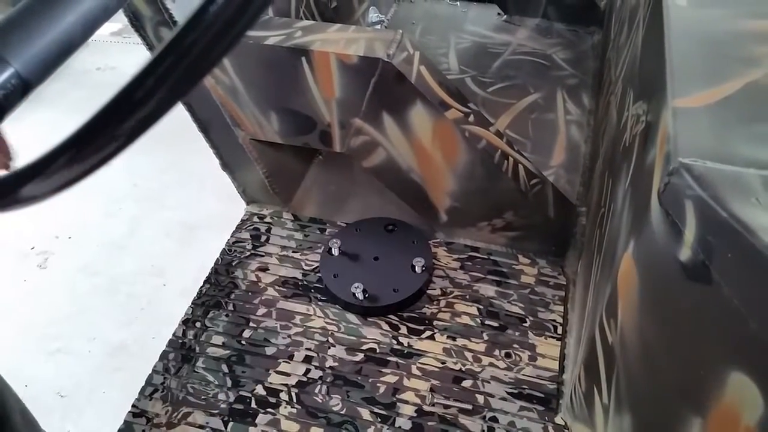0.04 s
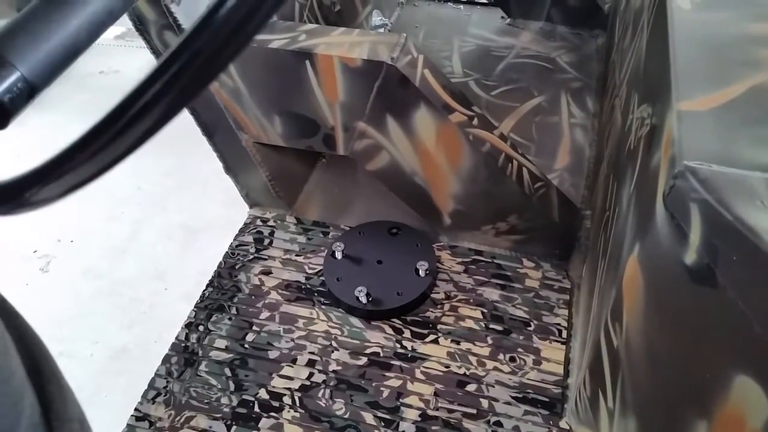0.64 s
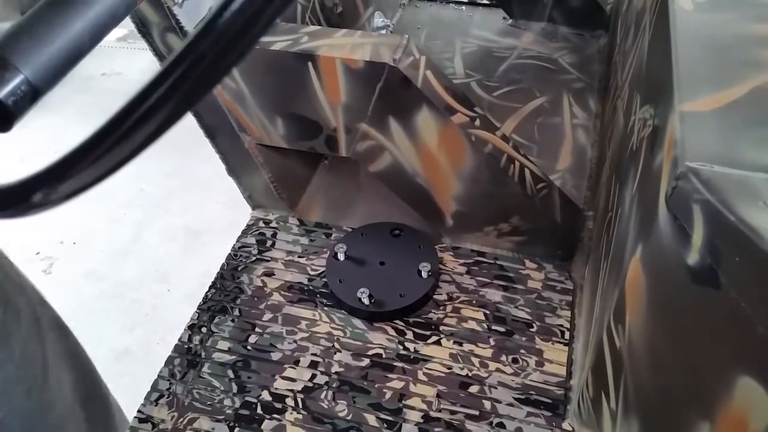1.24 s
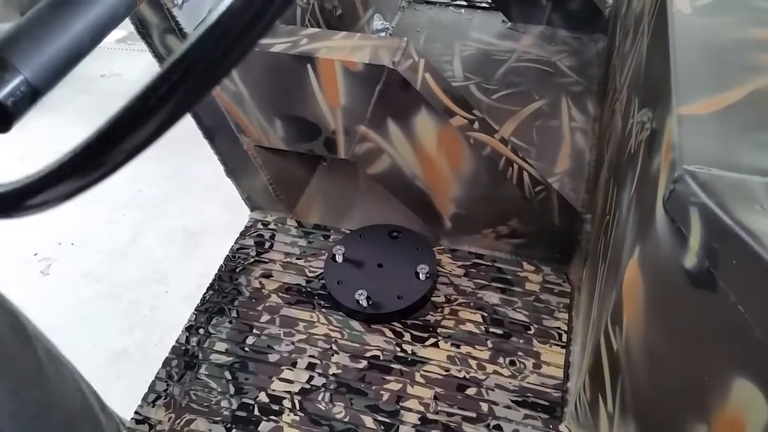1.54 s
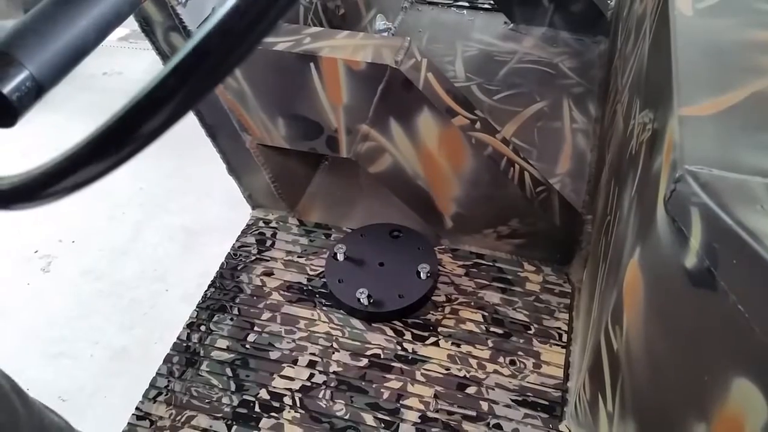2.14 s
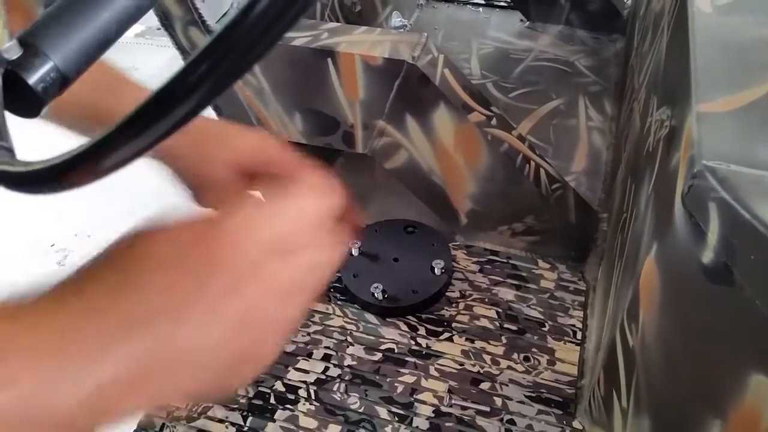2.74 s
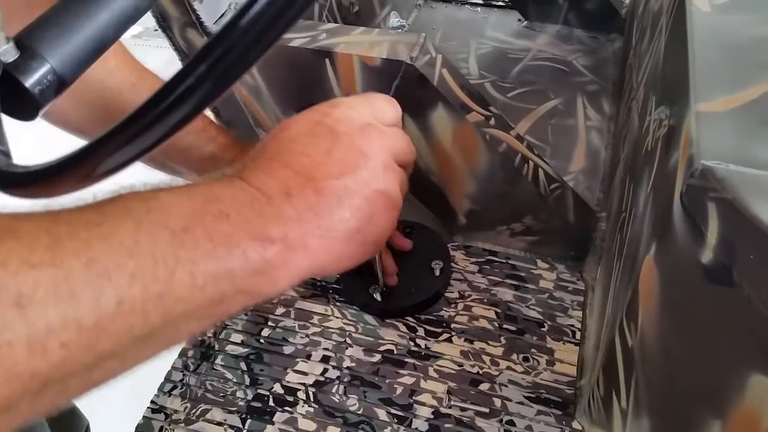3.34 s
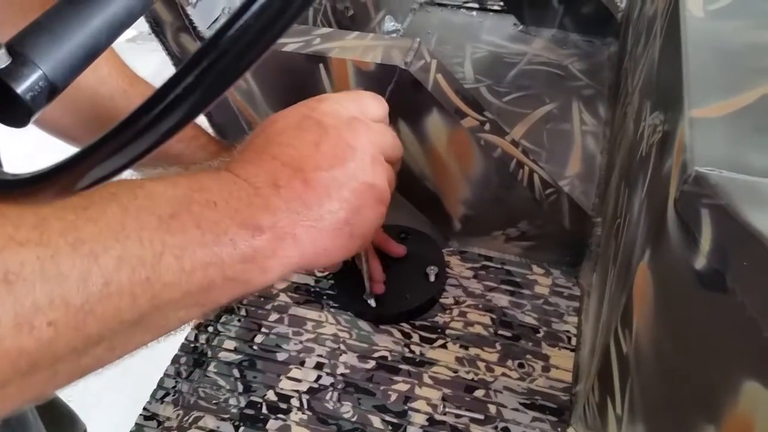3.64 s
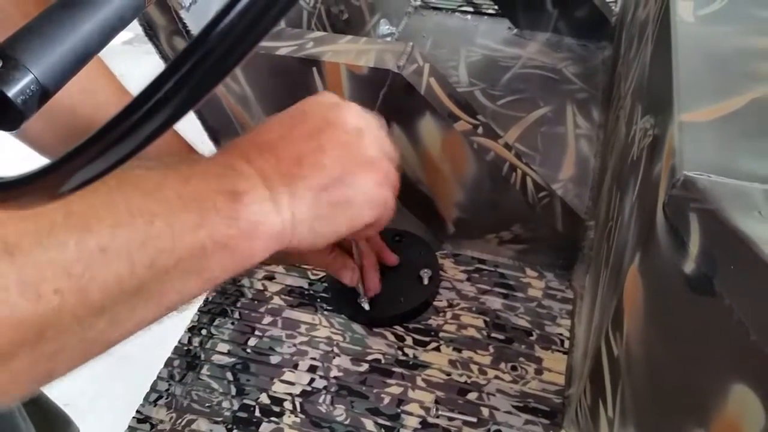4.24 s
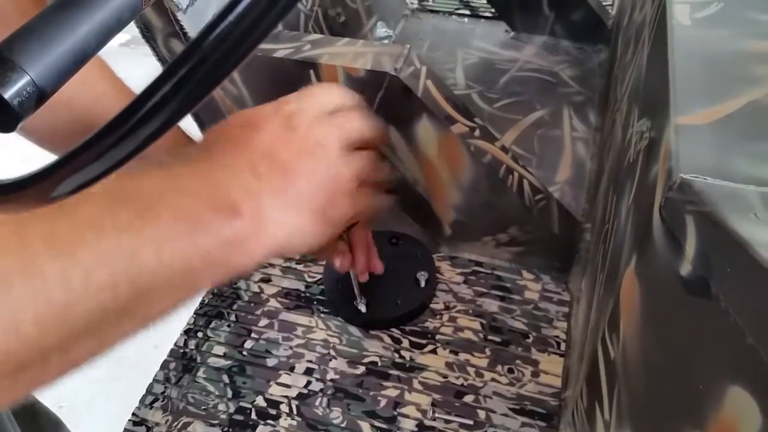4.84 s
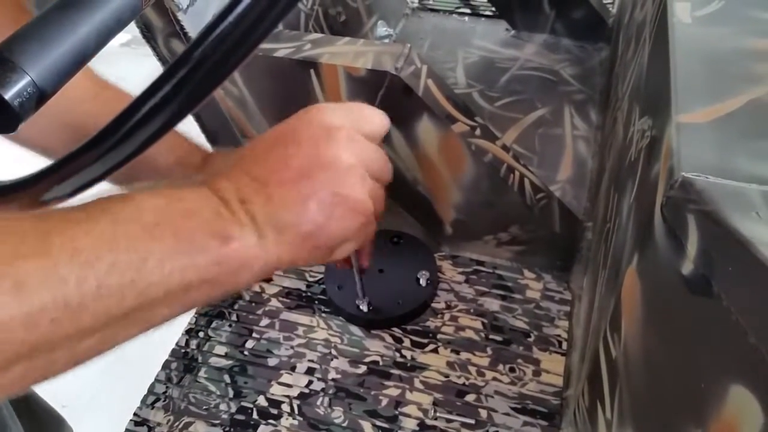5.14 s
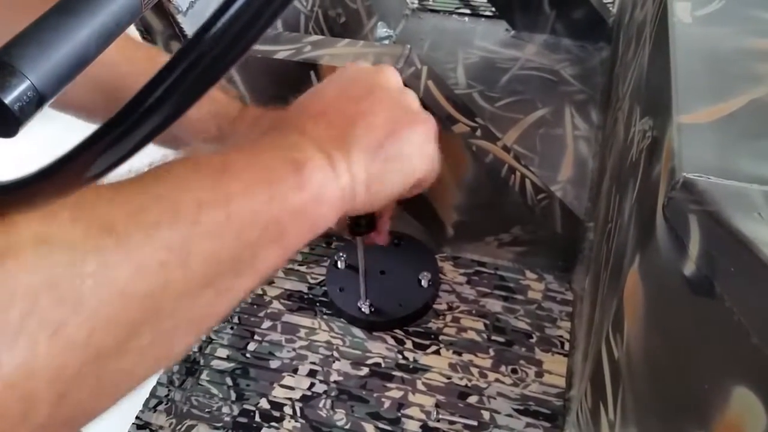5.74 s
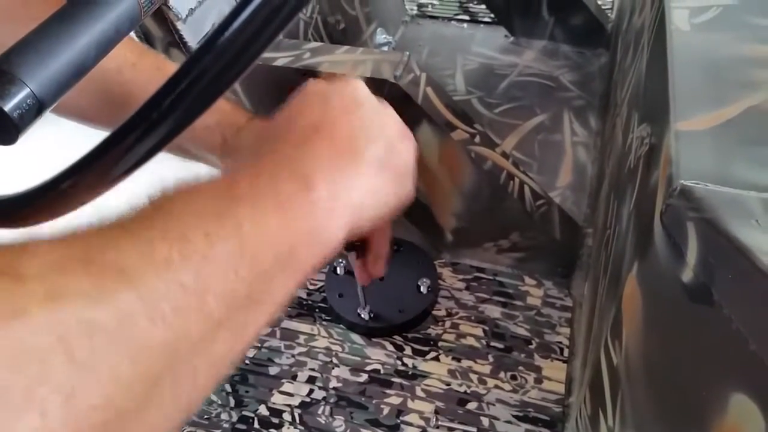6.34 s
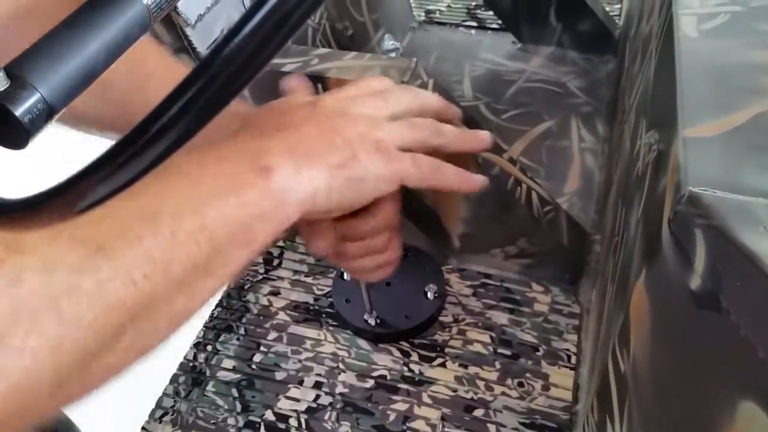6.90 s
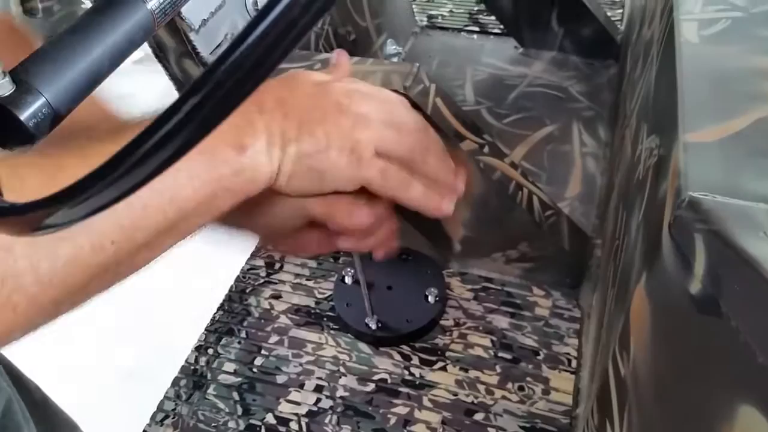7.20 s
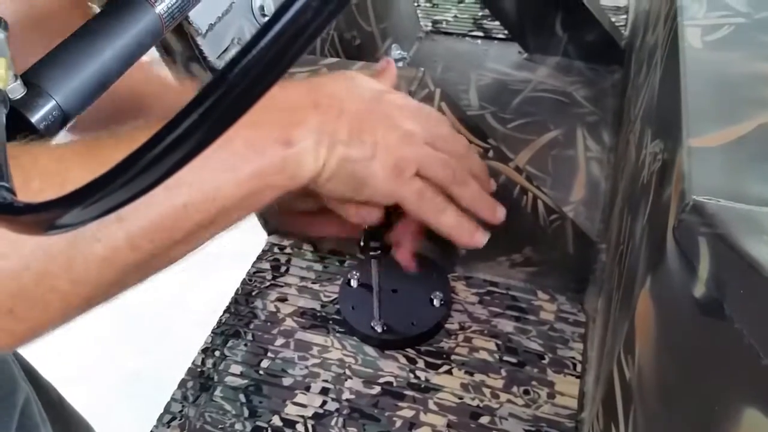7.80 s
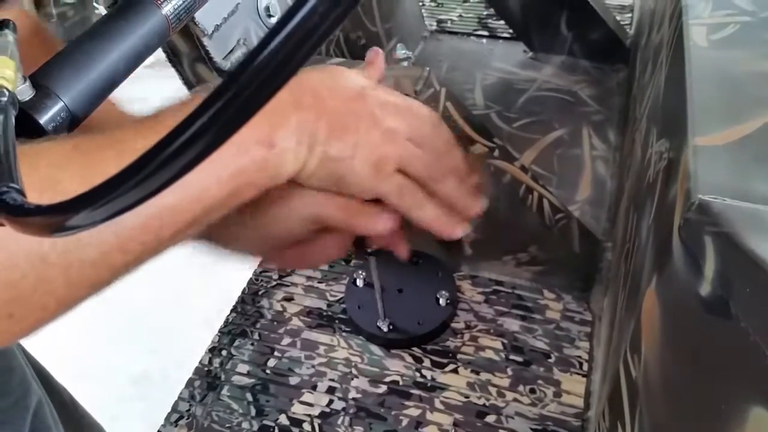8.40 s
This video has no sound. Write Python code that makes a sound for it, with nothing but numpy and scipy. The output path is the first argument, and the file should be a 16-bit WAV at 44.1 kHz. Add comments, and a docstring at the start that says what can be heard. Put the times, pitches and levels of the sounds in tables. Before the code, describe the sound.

Faint insects shrill over a low rumble in an open workshop. Small screws rustle and clink, then metal judders across a boat hull and a steel tool clatters down loudly. Close by, a screwdriver knocks and clicks irregularly in a screw, ringing a plate and thudding in the deck. One hard knock rattles the boat, and quicker taps follow as the handle rubs softly in the hand.

```python
"""In an open workshop, on the deck of an aluminium boat, a screwdriver works a screw into a round plate.
Insects shrill outside over a low rumble. Small parts rustle and clink, then something metal judders
over the hull and clatters down. The blade knocks and clicks in the screw head, each knock ringing the
plate and booming in the deck, while the handle rubs in the hand. The hardest knock rattles the boat."""
import sys
import numpy as np
from scipy import signal
from scipy.fft import rfft, irfft, next_fast_len
from scipy.io import wavfile

SR = 44100
rng = np.random.default_rng(int(sys.argv[2]) if len(sys.argv) > 2 else 0)


def wav_out(sig):
    """Save sig, one row per channel (or a flat mono array), as 16-bit PCM at SR to the path in sys.argv[1]."""
    wavfile.write(sys.argv[1], SR, np.round(np.clip(np.atleast_2d(sig).T, -1, 1) * 32767).astype(np.int16))


N = 381906
TIME = np.arange(N) / SR
RING_SIZE = 2 ** 15  # samples given to one blow to die away
RING_TIME = np.arange(RING_SIZE) / SR


def amp(db):
    """Turns decibels into a gain."""
    return 10 ** (np.asarray(db) / 20)


def evened(x):
    """Scales a sound to an average (rms) level of 1."""
    return x / np.sqrt(np.mean(x ** 2) + 1e-20)


def unit_attack(x, size=512):
    """Scales a blow so that its first moments have an average level of 1."""
    return x / np.sqrt(np.mean(x[:size] ** 2) + 1e-20)


def level_at(colour, hz):
    """Reads a colour, a list of (Hz, dB) points, at any pitch."""
    pitches, levels = np.transpose(colour)
    return np.interp(np.log(hz + 1), np.log(pitches + 1), levels)


def add(mix, start_s, sound):
    """Lays a sound into the mix."""
    part = mix[round(start_s * SR):][:len(sound)]
    part += sound[:len(part)]


def coloured(x, colour):
    """Makes each pitch in a sound as strong as the colour says."""
    gain = amp(level_at(colour, np.fft.rfftfreq(len(x), 1 / SR)))
    return evened(irfft(rfft(x) * gain, len(x)))


def noise(colour, size):
    """Smooth noise of a given colour."""
    return coloured(rng.standard_normal(next_fast_len(size, True)), colour)[:size]


def band(x, low_hz, high_hz):
    """Keeps what lies between two pitches."""
    return signal.sosfilt(signal.butter(4, [low_hz, high_hz], "band", fs=SR, output="sos"), x)


def drift(slow_hz, fast_hz):
    """A slow random wander, made of 20 sine waves."""
    rates = np.geomspace(slow_hz, fast_hz, 20)
    return evened(sum(np.sin(2 * np.pi * (hz * TIME + rng.random())) for hz in rates))


def dying(t60):
    """A fade that falls 60 dB in t60 seconds, the fade time."""
    return np.exp(-np.log(1000) * RING_TIME / t60)


def tail(sound, t60, rise_s):
    """Lets a sound build up and die away."""
    return sound * dying(t60) * (1 - np.exp(-RING_TIME / rise_s))


def ring(tones, scatter_db, detune, contact_s):
    """Struck metal rings; each blow lands elsewhere and mixes its tones anew. Long contact is softer."""
    sound = np.zeros(RING_SIZE)
    for hz, db, t60 in tones:
        louder, sharper, direction = rng.standard_normal(3)
        wave = np.sin(2 * np.pi * hz * (1 + detune * sharper) * RING_TIME)
        sound += np.sign(direction) * amp(db + scatter_db * louder) * dying(t60) * wave
    return unit_attack(sound * (1 - np.exp(-RING_TIME / contact_s)))


# The colours of the rumble and the air, and the hum's tones. Each row: pitch in Hz, level in dB.
RUMBLE_COLOUR = [(12, -43), (25, -5.5), (33, -16.5), (58, -1), (82, -8), (100, -11), (125, -6.5),
                 (260, -27), (500, -33.5), (1000, -59.5)]
AIR_COLOUR = [(60, -10), (180, 0), (300, -3), (500, -8), (1000, -20), (2200, -29), (2900, -37), (4300, -31),
              (7000, -54), (16000, -75)]
HUM_TONES = [(59, -68), (118, -57.5)]


def workshop(swell_db=7, peak_s=5.3, width_s=1):
    """A low rumble wavers and swells once, over steady air and a faint mains hum."""
    swell = swell_db * np.exp(-((TIME - peak_s) / width_s) ** 2 / 2)
    rumble = amp(-52.5 + swell + drift(slow_hz=2, fast_hz=6.8)) * noise(RUMBLE_COLOUR, N)
    hum = sum(amp(db) * evened(np.sin(2 * np.pi * (hz * TIME + rng.random()))) for hz, db in HUM_TONES)
    return rumble + amp(-56.5) * noise(AIR_COLOUR, N) + hum


# The colour of the insects' shrill. Each row: pitch in Hz, level in dB.
INSECT_COLOUR = [(6000, -52), (7000, -41), (7300, -34), (7600, -24.5), (7950, -11.5), (8350, -6), (8580, 0),
                 (8780, -5), (9350, -16), (10000, -20.5), (10700, -32), (12200, -41), (14000, -64)]
# How their chorus swells and ebbs. Each row: time in seconds, change of level in dB.
CHORUS_SWELLS = [(0, -2), (.8, -1), (1.2, -4.5), (1.9, -.5), (2.8, 1), (3.25, 2.5), (3.55, -1), (3.8, 2.5),
                 (4.3, 3), (4.52, -3), (4.85, 3), (5.1, -1), (5.35, 3), (5.9, 0), (6.3, -5.5), (6.7, 0),
                 (7.4, 3), (8, 1), (8.66, 0)]


def insects(likeness=.98, right_db=-3):
    """Many small wings shrill together, their pulses overlapping into a quick flutter."""
    swell_db = np.interp(TIME, *np.transpose(CHORUS_SWELLS))
    level = amp(-52 + swell_db + .8 * drift(slow_hz=2, fast_hz=7))
    flutter_db = .3 * evened(band(rng.standard_normal(N), 30.2, 150))
    left = noise(INSECT_COLOUR, N)
    right = likeness * left + np.sqrt(1 - likeness ** 2) * noise(INSECT_COLOUR, N)
    return level * evened(amp(flutter_db)) * np.array([left, right * amp(right_db)])


# Echoes off the hull's near walls. Each row: delay in seconds, level in dB.
WALL_ECHOES = [(.00127, -9), (.00219, -9), (.0034, -7), (.00533, -10), (.00781, -11)]


def grit(colour, size, catches_per_s=450, spread_db=4.5):
    """Tiny catches of uneven size over a smooth hiss, thrown back by the near walls."""
    span = next_fast_len(size, True)
    catches = amp(spread_db * np.minimum(rng.exponential(1, span), 4)) * rng.choice([-1, 1], span)
    hiss = rng.standard_normal(span)
    caught = rng.random(span) < catches_per_s / SR
    direct = hiss + evened(catches * caught)
    echoes = sum(amp(db) * np.roll(direct, round(s * SR)) for s, db in WALL_ECHOES)
    return coloured(direct + echoes, colour)[:size]


# The colour of small parts rustling. Each row: pitch in Hz, level in dB.
RUSTLE_COLOUR = [(400, -14), (1000, -9.5), (1700, 6), (2500, -1.5), (3300, -14.5), (4500, -8), (6500, -21),
                 (8800, 13), (11000, -6.5), (16000, -21)]
# Parts are picked up or set down. Each row: start in seconds, level in dB, fade time in seconds.
RUSTLES = [(0.358, -51, 0.43), (1.352, -47, 0.64), (1.745, -61.5, 0.38)]


def rustles():
    """A handful of small parts shifts and settles."""
    out = np.zeros(N)
    for s, db, t60 in RUSTLES:
        add(out, s, amp(db) * tail(grit(RUSTLE_COLOUR, RING_SIZE), t60, rise_s=.033))
    return out


# The four noisy parts of a blow: the plate's clack, the deck's thud, the shaft's tick, the tip's snap.
# Each row: lowest and highest pitch in Hz, level in dB, fade time in seconds, level of its tail in dB.
BLOW_PARTS = [(480, 2500, -6, .04, -9), (165, 400, -4, .05, -3), (3300, 5500, -7, .024, -19),
              (7500, 12000, -4, .024, -18)]
CLACK, THUD, TICK, SNAP = BLOW_PARTS


def crack(part, colour, contact_s=.00016):
    """One part of a blow: a short burst, its echo off the hull's side and a longer tail."""
    low_hz, high_hz, db, t60, tail_db = part
    hiss = noise(colour, RING_SIZE)
    fade = dying(t60)
    add(fade, .0034, amp(-4) * dying(t60 / 2))  # the echo
    onset = (1 - np.exp(-RING_TIME / contact_s)) ** 2
    burst = unit_attack(band(hiss * fade * onset, low_hz, high_hz))
    hull_tail = tail(evened(band(hiss, low_hz, high_hz)), t60=.55, rise_s=.0083)
    return amp(db) * (burst + amp(tail_db) * hull_tail)


# The tones of the round plate. Each row: pitch in Hz, level in dB, fade time in seconds.
PLATE_TONES = [(505, -1, .2), (682, 0, .3), (772, 2.5, .22), (850, 3, .09), (900, 6, .1), (958, 8, .08),
               (1180, 2, .08), (1262, 8, .07), (1400, 0, .14), (1710, -9, .2), (1885, 1, .11),
               (2040, -2, .15), (2210, -6, .15), (2430, -3, .11)]


def plate(ring_hz, favour_db=7, width_octaves=.2):
    """The plate rings hollowly; the place of the blow favours the tones near one pitch."""
    tones = [(hz, db + favour_db * np.exp(-(np.log2(hz / ring_hz) / width_octaves) ** 2), t60)
             for hz, db, t60 in PLATE_TONES]
    return ring(tones, scatter_db=2.5, detune=.007, contact_s=.0006)


# The tones of the deck, lowest first. Each row: pitch in Hz, level in dB, fade time in seconds.
DECK_TONES = [(200, -14.5, 0.014), (206.7, 4, 0.12), (236.1, -7, 0.42), (274, 2, 0.19), (320.2, 3, 0.093),
              (426, -27, 0.043)]


def deck_thud(db):
    """A heavier blow moves more of the deck and so favours its lowest tones."""
    db_per_octave = -.057 * max(db + 27, -4)
    lowest_hz = DECK_TONES[0][0]
    tones = [(hz, level + db_per_octave * np.log2(hz / lowest_hz), t60) for hz, level, t60 in DECK_TONES]
    boom = crack(THUD, [(150, .0068), (300, db_per_octave), (600, 2 * db_per_octave)])
    ringing = ring(tones, scatter_db=-.5, detune=.028, contact_s=.002)
    return amp(db) * (amp(-11.5) * boom + amp(-4.5) * ringing)


# The colours of the plate's clack and of the steel's clicks. Each row: pitch in Hz, level in dB.
CLACK_COLOUR = [(400, -4.5), (500, 1.5), (570, -8.5), (680, 1.5), (950, -4.5), (1060, -8), (1260, -3.5),
                (1580, -15), (1880, -8), (2400, -14.5), (2750, -16.5), (4500, -12), (8000, -27.5)]
CLICK_COLOUR = [(2300, -15), (3100, -15), (4500, 3), (6500, -18.5), (8900, 9.5), (11500, -17.5),
                (16000, 18)]


def strike(clack_db, thud_db, tick_db, snap_db, ring_hz=950, softest_s=.003):
    """One contact: tip and shaft click, the plate clacks and rings, and the deck booms."""
    contact_s = min(.0005 * amp(-22 - max(clack_db, snap_db)), softest_s)  # gentle touches start softly
    clack = amp(-1) * crack(CLACK, CLACK_COLOUR, contact_s) + amp(-6.5) * plate(ring_hz)
    tick = crack(TICK, CLICK_COLOUR, contact_s)
    snap = crack(SNAP, CLICK_COLOUR, contact_s)
    return amp(clack_db) * clack + deck_thud(thud_db) + amp(tick_db) * tick + amp(snap_db) * snap


# Clinks of loose screws. Each row: start in seconds, then levels of snap, clack and tick in dB.
CLINKS = [(0.383, -38.5, -48.5, -55.5), (1.365, -51, -57, -72), (1.387, -37.5, -50.5, -64),
          (1.511, -61.5, -64, -70), (1.579, -58.5, -59.5, -73), (3.359, -20, -36.5, -48),
          (3.366, -27.5, -42, -46.5)]


def clinks():
    """Small screws touch metal: crisp, but too light to move the deck much."""
    out = np.zeros(N)
    for s, snap_db, clack_db, tick_db in CLINKS:
        add(out, s, strike(clack_db, clack_db + 1, tick_db, snap_db, softest_s=.0012))
    return out


# Knocks of the blade. Each row: start in seconds, strength in dB, weight of the hand behind it in dB,
# hardness of steel on steel in dB, pitch the plate favours in Hz.
KNOCKS = [(0.823, -46.5, 5.5, -40, 895), (0.846, -53, 2, -30, 1050), (3.479, -42.5, 14, -4, 960),
          (3.662, -29.5, 9.5, -5.5, 507), (3.799, -35.5, -2, -9, 1900), (3.812, -27.5, 10.5, 0, 775),
          (3.872, -35, 16.5, 0, 700), (3.89, -22.5, 2.5, -1, 940), (3.998, -37.5, 4.5, -18, 950),
          (4.331, -35.5, 5.5, -34, 900), (4.53, -51.5, 3, -24, 1200), (4.875, -22, 4, -26.5, 1240),
          (4.908, -31, 4, -8.5, 1270), (5.725, -11, -4, -12.5, 1270), (6.264, -47.5, 14, -25, 950),
          (6.453, -54, 28, -32, 940), (6.767, -26.5, 1.5, -13.5, 860), (6.791, -23.5, 0, -6.5, 950),
          (6.886, -26.5, 5, -10, 950), (6.916, -31.5, -14, -19, 950), (7.082, -38, 18, -18, 1800),
          (7.098, -39, 14, -24, 780), (7.479, -33, 10, -7.5, 960), (7.655, -40.5, 7, -22, 950),
          (7.676, -45, -1, -14, 950), (7.743, -32, -4, -12, 1950), (7.878, -36.5, 8, -22, 850),
          (7.898, -37, 10.5, -12, 750), (8.098, -39.5, 10, -27, 690), (8.301, -47.5, 16, -27, 900),
          (8.402, -35, 11.5, -24, 940), (8.449, -42.5, 4, -26, 950), (8.517, -25, 1, -7.5, 1280)]


def knocks(usual_db=-22.5, shudder_above_db=-16, spins_from_s=6.7):
    """The blade hits the screw; weight adds to the deck's thud, hardness to the steel's clicks."""
    out = np.zeros(N)
    for s, db, weight_db, hardness_db, ring_hz in KNOCKS:
        thud_db = usual_db + 1.39 * (db - usual_db) + weight_db  # grows faster than the knock
        tick_db = db - 1.5 + .75 * hardness_db
        add(out, s, strike(db, thud_db, tick_db, db + hardness_db, ring_hz))
        if db > shudder_above_db:
            add(out, s, amp(db) * shudder())
        if s > spins_from_s:  # spinning freely, the blade grazes the slot just before each knock
            graze_db = db - 14
            add(out, s - .007, strike(graze_db, graze_db, graze_db - 20, graze_db - 20))
    return out


# Dull bumps against the deck. Each row: start in seconds, level in dB.
BUMPS = [(1.883, -42), (1.908, -39.5), (4.475, -41), (4.655, -40), (5.011, -28), (5.205, -36.5),
         (5.679, -34.5), (6.025, -39.5), (6.136, -33.5), (6.428, -36), (8.333, -34), (8.463, -36)]


def bumps():
    """Soft blows of hand and body boom in the deck and barely stir the plate."""
    out = np.zeros(N)
    for s, db in BUMPS:
        add(out, s, strike(clack_db=db - 14, thud_db=db, tick_db=db - 38, snap_db=db - 38))
    return out


# Slips of metal dragged over the hull. Each row: start in seconds, level in dB.
SLIPS = [(1.954, -26), (1.972, -28.5), (1.993, -18.5), (2.011, -18.5), (2.023, -14.5), (2.047, -19.5),
         (2.077, -15), (2.107, -20.5)]
# The tones each slip rings. Each row: pitch in Hz, level in dB, fade time in seconds.
HULL_TONES = [(182, -3, 0.092), (240.6, 5, 0.1), (236, -8.5, 0.13), (270, 5, 0.061), (380, -25.5, 0.32),
              (413.8, 3, 0.18), (838, 3, 0.12), (792, -2.5, 0.13), (900, 5.5, 0.026), (1135, -12.5, 0.12),
              (1287, -12.5, 0.22), (1666, -17.5, 0.17)]
# The colour of the scraping. Each row: pitch in Hz, level in dB.
SCRAPE_COLOUR = [(40, -35.5), (90, -12.5), (170, -14), (250, -11.5), (420, -8), (620, -13.5), (900, -8),
                 (1400, -19.5), (2200, -24.5), (3100, -45), (4500, -46.5), (7000, -57), (14000, -77)]


def judder():
    """Metal sticks and slips on the hull; each slip rings it, and harder ones scrape more."""
    out = np.zeros(N)
    for s, db in SLIPS:
        hiss = noise(SCRAPE_COLOUR, RING_SIZE)
        scrape = amp(-8) * tail(hiss, t60=.093, rise_s=.0042)
        scrape += amp(-13) * tail(hiss, t60=.77, rise_s=.0086)
        hull = amp(-1.5) * ring(HULL_TONES, scatter_db=0, detune=.0052, contact_s=.0043)
        add(out, s, amp(db) * (hull + amp(db + 18) * scrape))
    return out


# Bounces of a falling tool. Each row: start in seconds, level in dB.
BOUNCES = [(2.163, -17.5), (2.197, -20.5), (2.205, -21), (2.232, -18.5), (2.243, -22.5), (2.253, -22),
           (2.266, -19.5), (2.272, -22.5)]
# The tool's own tones. Each row: pitch in Hz, level in dB, fade time in seconds.
TOOL_TONES = [(1156, 0, .5), (1414, -2, .5), (1460, -7, .42), (1514, -6, .42), (1584, -1, .4),
              (2178, -5, .5), (2396, -7, .45), (2517, -10, .38), (2692, -14, .33), (3208, -17, .48),
              (3762, -13, .45), (4936, -15, .32), (8430, -12, .36), (9087, -5, .4), (9193, -5, .38)]
# The colour of its crash. Each row: pitch in Hz, level in dB.
CRASH_COLOUR = [(350, -26), (650, -30.5), (900, -7.5), (1180, 1.5), (1600, 0.5), (1850, -8), (2500, -4),
                (3080, -16), (3800, -9.5), (4900, -9), (7000, -20.5), (9000, -1), (11500, -20.5),
                (16000, -35.5)]


def clatter():
    """A steel tool bounces on sheet metal, shaking the deck and filling the workshop."""
    out = np.zeros(N)
    for s, db in BOUNCES:
        hiss = noise(CRASH_COLOUR, RING_SIZE)
        crash = amp(3) * hiss * dying(.056) + amp(-6.5) * tail(hiss, t60=.53, rise_s=.007)
        steel = amp(-11.5) * ring(TOOL_TONES, scatter_db=4, detune=.001, contact_s=.00087)
        deck = amp(-12) * ring(DECK_TONES, scatter_db=12.5, detune=.028, contact_s=.004)
        low_noise = evened(band(rng.standard_normal(RING_SIZE), 104, 270))
        boom = amp(-15.5) * tail(low_noise, t60=.73, rise_s=.02)
        add(out, s, amp(db) * (crash + steel + deck + boom))
    return out


# Strokes of the hand on the handle.
# Each row: middle in seconds, length in seconds, level in dB, fizz compared with the rub in dB.
STROKES = [(3.455, 0.13, -58, -21), (4.604, 0.23, -57.5, -16), (5.221, 0.076, -50.5, -8),
           (5.683, 0.055, -47.5, -12), (6.136, 0.079, -49, -17), (6.528, 0.096, -56, -14),
           (6.965, 0.19, -50.5, -24), (7.09, 0.071, -43, -23), (7.367, 0.27, -45.5, -16),
           (7.595, 0.18, -56, -10), (7.768, 0.2, -48.5, -11), (8.2, 0.16, -49, -6.5),
           (8.335, 0.032, -59.5, -5), (8.596, 0.14, -48.5, -4)]
# The colours of rubbing skin and of a quick stroke's fizz. Each row: pitch in Hz, level in dB.
RUB_COLOUR = [(300, -15.5), (550, -8.5), (950, -7), (1300, -10.5), (2400, -15.5), (3100, -22), (4500, -9),
              (5400, -25), (6400, -42), (8600, -8), (10500, -16), (12500, -24), (14500, -31), (16000, -50)]
FIZZ_COLOUR = [(3800, -40), (4800, -1), (5500, -8), (6500, -35), (10000, -15), (12500, 0), (14500, -5),
               (16000, -35)]


def handle_rubs(light_touch_db=-13, light_touch_s=.7):
    """Skin drags over the handle; each gritty stroke swells and fizzes inside a longer, lighter touch."""
    pressure, fizz = np.zeros(N), np.zeros(N)
    light_touch = np.hanning(round(light_touch_s * SR))
    for s, length_s, db, fizz_db in STROKES:
        stroke = amp(db) * np.hanning(round(length_s * SR))
        add(pressure, s - length_s / 2, stroke)
        add(fizz, s - length_s / 2, amp(fizz_db) * stroke)
        add(pressure, s - light_touch_s / 2, amp(db + light_touch_db) * light_touch)
    return pressure * grit(RUB_COLOUR, N) + fizz * grit(FIZZ_COLOUR, N)


def blade_rocking(start_s=3.8, nudges_per_s=20):
    """While the blade sits in the screw it rocks a little, grinding and nudging the deck."""
    out = np.zeros(N)
    length_s = N / SR - start_s
    for when, strength in rng.random((round(nudges_per_s * length_s), 2)):
        burst = tail(rng.standard_normal(RING_SIZE), t60=.41, rise_s=.0044)
        grind = amp(-15) * unit_attack(band(burst, 396, 1380))
        deck = ring(DECK_TONES, scatter_db=5.5, detune=.06, contact_s=.0047)
        add(out, start_s + when * length_s, amp(-53.25 + 7 * strength) * (deck + grind))
    return out


# The colour of loose fittings rattling. Each row: pitch in Hz, level in dB.
RATTLE_COLOUR = [(300, -30), (900, -16), (1400, 5), (2300, 1), (3100, -11), (4300, -5.5), (5500, -14),
                 (7200, -13), (9200, -3.5), (11000, -27), (16000, -40)]


def shudder():
    """After a hard blow, loose fittings rattle and the hull drones on."""
    rattle = tail(grit(RATTLE_COLOUR, RING_SIZE), t60=.59, rise_s=.017)
    low_noise = evened(band(rng.standard_normal(RING_SIZE), 152, 290))
    drone = tail(low_noise, t60=.6, rise_s=.019)
    return amp(-21.5) * rattle + amp(-13.5) * drone


# How the sound of the work leans to one side. Each row: pitch in Hz, left minus right in dB.
SIDEWAYS_LEAN = [(2000, 0), (4500, -1), (7000, -6.5), (8800, 4.5), (11000, 0.5), (15000, -1.7)]


def scene():
    """The work lies straight ahead, its treble leaning a little to either side, amid the background."""
    work = knocks() + clinks() + bumps() + judder() + clatter()
    work += handle_rubs() + rustles() + blade_rocking()
    left_over_right = amp(level_at(SIDEWAYS_LEAN, np.fft.rfftfreq(N, 1 / SR)))
    side = irfft(rfft(work) * (left_over_right - 1) / (left_over_right + 1), N)
    return np.array([work + side, work - side]) + insects() + workshop()


def record(dry):
    """Rounds off the loudest peaks and cuts the treble above 16200 Hz."""
    rounded = .8 * np.tanh(dry / .8)
    low_pass = signal.firwin(511, 16200, window=("kaiser", 9), fs=SR)
    return signal.oaconvolve(rounded, low_pass[None], "same")


dry = scene()
out = record(dry)
wav_out(out)
```